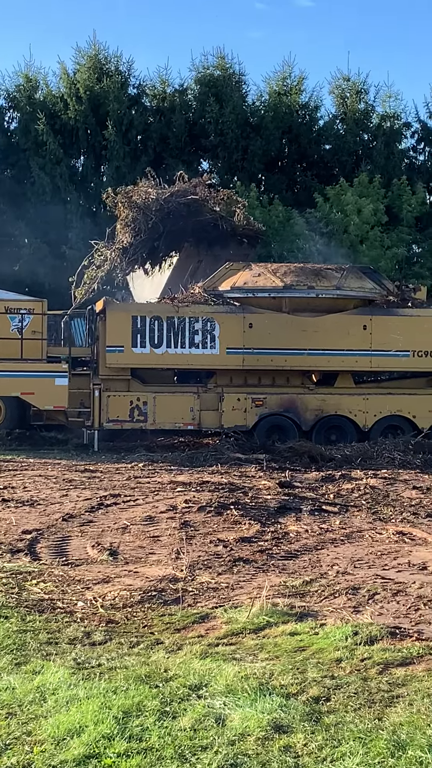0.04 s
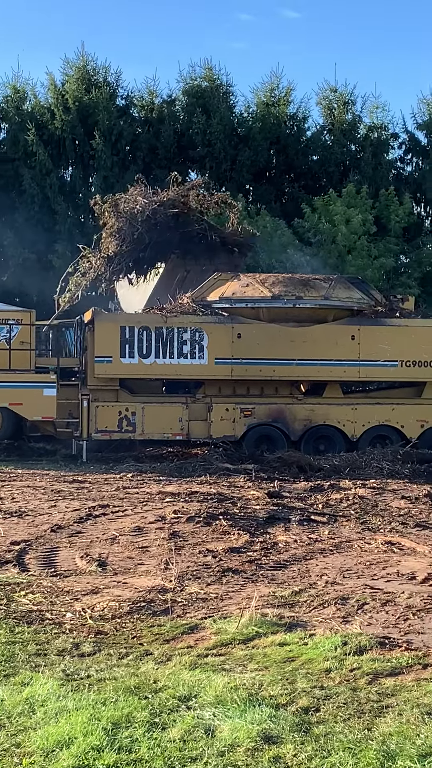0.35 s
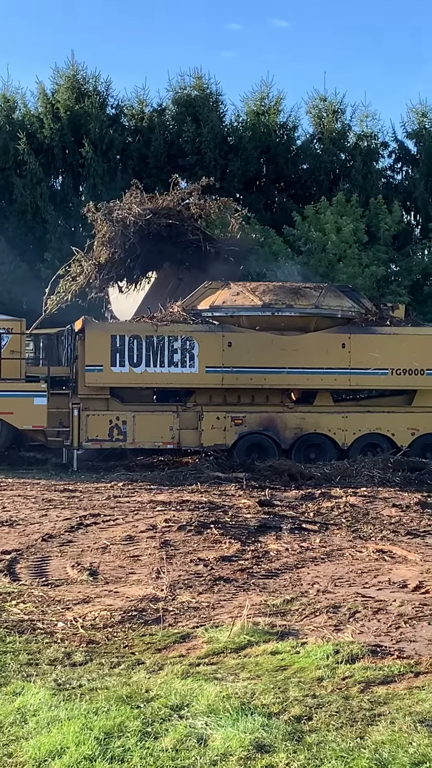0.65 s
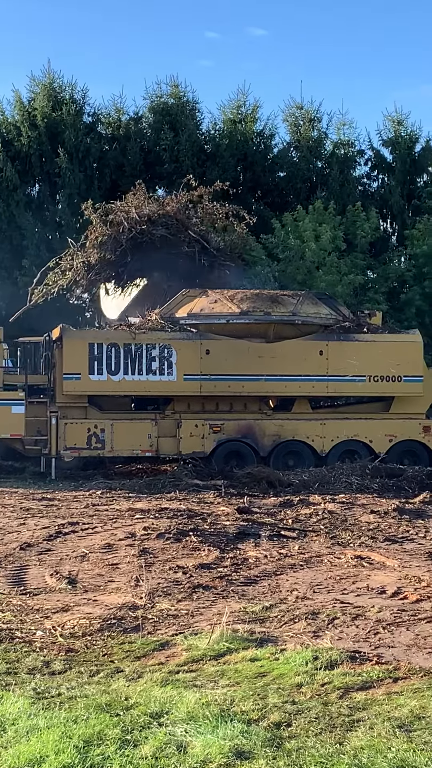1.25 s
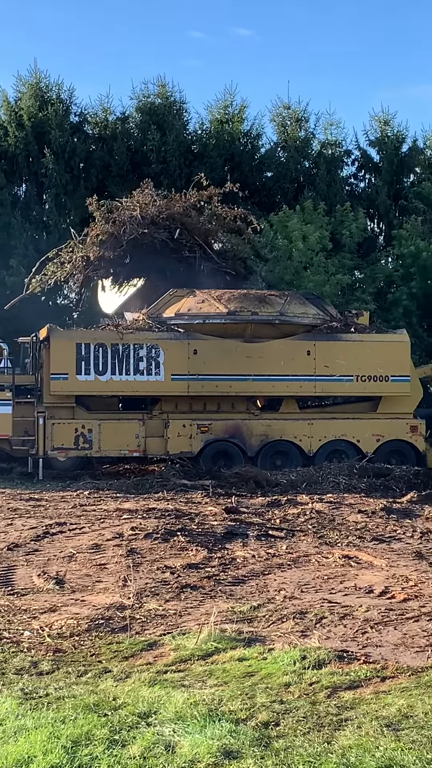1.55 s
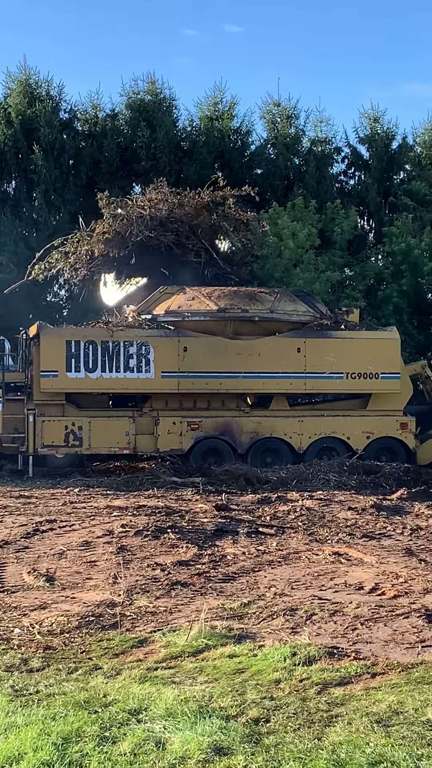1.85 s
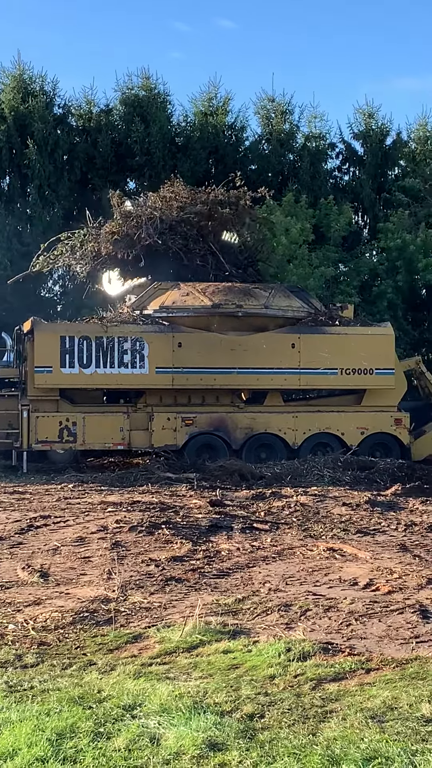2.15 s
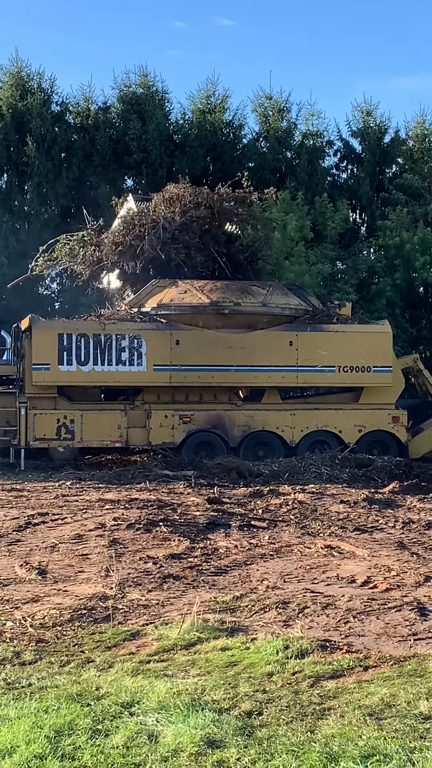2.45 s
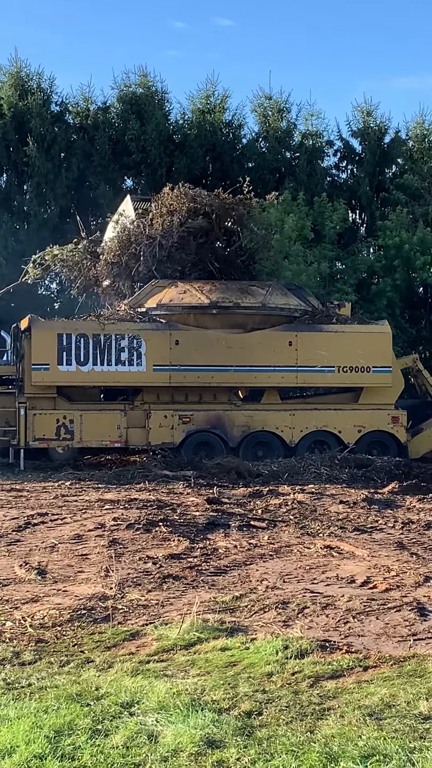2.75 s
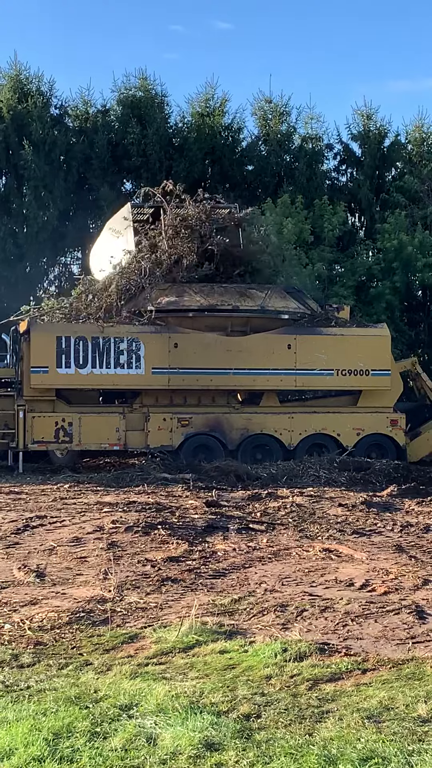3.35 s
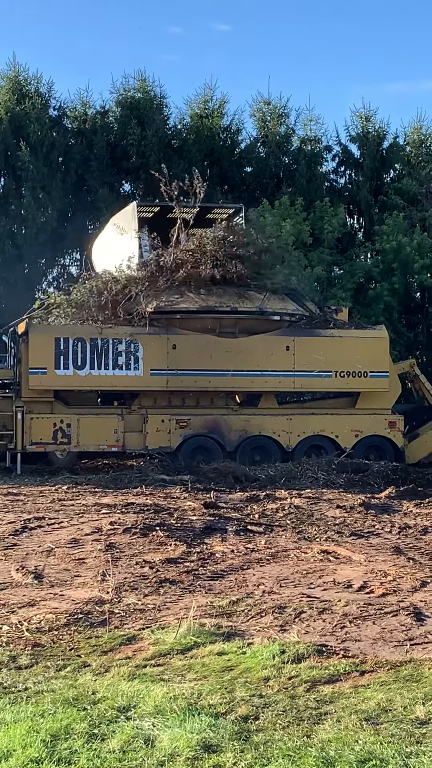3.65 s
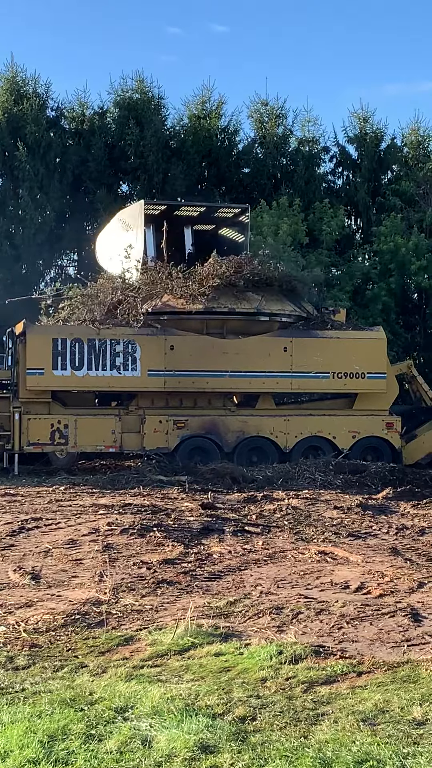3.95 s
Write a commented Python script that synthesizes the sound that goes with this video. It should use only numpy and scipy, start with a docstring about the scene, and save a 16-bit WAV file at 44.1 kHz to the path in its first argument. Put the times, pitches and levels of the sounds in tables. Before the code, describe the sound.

A tub grinder chews brush throughout, heard from a distance outdoors: two diesel engines drone over a low rumble, rattling chips and hissing twigs. At about 0.8 seconds a heavy piece bangs on the steel tub, followed by a brief squeal. Lighter knocks come at 1.4 and 3.4 seconds. Branches crunch and snap irregularly with a slight echo, most around 1.5, 2.2 and 3 seconds.

```python
"""A tub grinder chewing brush

A loader feeds a diesel grinder on open ground, heard from afar by two close microphones.
Both engines drone over the rumbling hammermill. Chips batter the steel tub, twigs shred into a hiss,
branches crunch and sticks snap. One heavy piece bangs on the tub, jammed wood squeals briefly,
and two lighter knocks follow. The crunches, snaps and knocks echo off the machines and trees."""
import sys
import numpy as np
from scipy import signal
from scipy.fft import rfft, irfft
from scipy.io import wavfile
from scipy.ndimage import uniform_filter1d

SR = 44100
rng = np.random.default_rng(int(sys.argv[2]) if len(sys.argv) > 2 else 0)


def master_out(mix):
    """Clip the mix to full scale and print it as 16-bit PCM to the path in sys.argv[1]."""
    frames = np.transpose(np.atleast_2d(mix))
    ceiling = np.clip(frames, -1, 1)
    pcm = np.round(ceiling * 32767).astype(np.int16)
    wavfile.write(sys.argv[1], SR, pcm)


N = 176400
TIME = np.arange(N) / SR

# Engine pitch, at 6 (grinder) and 5 (loader) cycles per turn of the crankshaft: t/s, f/Hz
GRINDER_PITCH = [(0.0, 207.1), (0.07, 205.0), (0.42, 210.8), (1.78, 210.8), (2.06, 208.2), (2.66, 210.7),
                 (3.8, 210.8)]
LOADER_PITCH = [(0.0, 189.0), (0.93, 189.5), (1.57, 190.5), (1.96, 188.5), (3.13, 190.5), (3.8, 189.5)]
# The tones in each engine's drone: cycles per turn, level/dB
GRINDER_TONES = [(2, -32.5), (4, -35), (6, -25.5), (12, -44.5), (18, -33), (21, -51), (37.5, -41.5)]
LOADER_TONES = [(3, -8), (5, 0.5), (7.5, -16.5), (8.5, -20.5), (37.5, -20), (43, -16)]
# How the nonstop sounds swell and fade: t/s, level/dB
LOADER_LEVEL = [(0, -17.5), (.7, -23), (1, -31.5), (1.5, -20.5), (2.2, -24), (3, -23), (4, -26)]
RUMBLE_LEVEL = [(0, -24), (.15, -21.5), (.48, -25.5), (.75, -21), (1, -29), (1.25, -27), (1.5, -23.5),
                (1.9, -21), (2.15, -22), (2.33, -27.5), (2.8, -24), (3.2, -25.5), (3.45, -25.5), (4, -24.5)]
CHIPS_LEVEL = [(0, -16), (.13, -22.5), (.4, -24.5), (.8, -24), (1.05, -27), (1.32, -27.5), (1.42, -24),
               (1.75, -23), (1.95, -22.5), (2.27, -22.5), (2.47, -26), (2.8, -24.5), (3.05, -23.5),
               (3.22, -25.5), (3.38, -23.5), (3.8, -26.5), (4, -24)]
TWIGS_LEVEL = [(0, -30), (.2, -32.5), (.4, -31.5), (.6, -33.5), (.82, -34.5), (.9, -38.5), (1.15, -39.5),
               (1.35, -36.5), (1.5, -31), (1.62, -35.5), (1.78, -33.5), (1.81, -29), (1.88, -32.5),
               (2.15, -29.5), (2.46, -32.5), (2.75, -28), (3.03, -30), (3.25, -32), (3.33, -29),
               (3.38, -30.5), (4, -32)]
# The tone colour of each noise, from bass to treble: f/Hz, level/dB
RUMBLE_COLOUR = [(12, -75), (26, -49), (36, -14), (48, -5), (70, 1), (110, 1.5), (160, 1.5), (230, 0),
                 (290, -9), (370, -19.5), (600, -25), (2000, -74.5)]
CHIPS_COLOUR = [(200, -16.5), (380, -6), (520, -3.5), (650, -1), (800, 2), (940, -8), (1060, -2.5),
                (1260, -1.5), (1500, -5.5), (1750, -3.5), (2100, -10.5), (2600, -20.5), (4000, -14.5),
                (12000, -78)]
TWIGS_COLOUR = [(900, -17), (2400, 2), (3400, 1.5), (4600, -1), (6200, -2), (7700, -7), (8200, -5.5),
                (10000, -9), (12500, -15), (14500, -18), (16000, -25)]
CRACK_COLOUR = [(150, -42.5), (380, -30), (550, -1.5), (720, 4.5), (950, -14), (1300, 3), (1900, 1.5),
                (2500, -8.5), (4000, -16.5), (12000, -62)]
SPLINTER_COLOUR = [(700, -16), (1800, -2.5), (3100, 7), (4000, 3), (5200, -3.5), (7500, -15), (9000, -18.5),
                   (15000, -28)]
SNAP_COLOUR = [(600, -36), (2000, 10.5), (3300, 5), (6000, 2), (10000, -5), (15000, -25)]
CLUNK_COLOUR = [(150, -48), (420, -40), (550, 6.5), (780, 5.5), (940, -25), (1080, -15), (1280, -1.5),
                (1550, -5), (2100, -7), (2600, -25), (8000, -45)]
# The steel tub's notes: f/Hz, level under chips/dB, level under a blow/dB, time to fade 60 dB/s
TUB_NOTES = [(523, -7.5, -11, 0.9), (564, -21, -7.5, 0.67), (626, -9, -9, 0.56), (697, 9, -25, 0.089),
             (778, -11, -8.5, 1), (1229, 2, -17, 0.12), (1290, -12, -13, 0.42), (1613, 3, -24, 0.2),
             (2010, -21, -20, .08)]
# The struck wood's notes: f/Hz, level/dB, time to fade 60 dB/s
WOOD_NOTES = [(630, -15, 0.021), (660, -5, 0.048), (782, -1, 0.054), (1263, -2.5, 0.044), (1540, -9, 0.027),
              (1900, -5, 0.016), (2170, -23, .014)]
# Branches caught by the hammers: t/s, length/s, crack level/dB, splinter level/dB
CRUNCHES = [(.002, 0.046, -38, -36), (0.17, .035, -26.5, -28), (0.623, 0.031, -40, -30.5),
            (0.738, 0.023, -24, -22), (0.768, 0.012, -35, -25), (0.827, 0.025, -21, -21),
            (0.962, 0.01, -45, -41), (1.153, 0.029, -57, -37.5), (1.401, 0.024, -23.5, -53),
            (1.465, 0.012, -31, -26), (1.498, 0.029, -19, -23), (1.533, 0.031, -23.5, -42),
            (1.661, 0.04, -17, -31), (1.799, 0.05, -34, -30), (2.017, 0.017, -23, -32),
            (2.079, 0.022, -23.5, -30), (2.131, 0.043, -24, -21.5), (2.217, 0.01, -25.5, -22),
            (2.227, 0.058, -22.5, -51), (2.302, 0.025, -40, -29.5), (2.338, 0.021, -31, -27.5),
            (2.626, 0.015, -25, -47), (2.721, 0.019, -27, -44.5), (2.925, 0.046, -23, -24.5),
            (2.986, 0.025, -20.5, -19), (3.018, 0.094, -30, -39), (3.313, 0.021, -30, -29.5),
            (3.487, 0.044, -29, -29), (3.581, 0.0088, -21.5, -31)]
# Thick wood thumping in the mill: t/s, level/dB, f/Hz
THUMPS = [(0.03, -10, 161), (0.089, -20, 123), (1.916, -19, 85), (2.09, -22, 78), (2.105, -14.5, 158),
          (2.227, -22, 66), (2.749, -24.5, 139)]
# Echoes off the machines and trees: delay/s, level/dB
ECHOES = [(.047, -10), (.083, -9.5), (.128, -21.5)]
# Dry sticks snapping: t/s, level/dB
SNAPS = [(0.1821, -21), (0.7409, -29), (0.7723, -25), (0.8257, -14.5), (.972, -28), (1.4128, -34),
         (1.472, -16), (1.4996, -26), (1.5146, -20), (1.6628, -32), (2.1342, -18.5), (2.217, -14),
         (2.3008, -28), (2.3447, -28), (2.9339, -20), (2.9893, -16), (3.512, -14.5)]
# The heavy piece hammered against the tub, then two lighter knocks: t/s, level/dB
BLOWS = [(.8285, -5), (.8323, -7.5), (.8349, -17), (.8426, -5.5), (.8535, -11), (.8845, -13.5),
         (1.391, -14), (3.384, -17.5)]
# How far the wave at the left microphone is ahead of the right: f/Hz, phase/rad
LEFT_LEAD = [(0, 0), (950, 0.48), (2000, 0.09), (2700, 1.89), (3500, 1.5), (4350, 2.5), (4780, 3),
             (5300, 4.5), (9000, 9.5), (13000, 15.5), (16000, 20.5)]
# Scattered sound reaching the microphones: f/Hz, level/dB
SCATTER_COLOUR = [(100, -29), (220, -33.5), (400, -6.5), (700, -20.5), (980, -4.5), (1400, -34), (2000, -8),
                  (2550, -19), (3200, -4.5), (6000, -39.5), (14000, -67)]


def from_db(db):
    """Turn decibels into a factor to multiply by."""
    return 10 ** (np.asarray(db) / 20)


def in_time(rows):
    """Join points in time with straight lines."""
    return np.interp(TIME, *np.transpose(rows))


def gains(spectrum):
    """Turn a tone colour into one factor per frequency."""
    hz, db = np.transpose(spectrum)
    return from_db(np.interp(np.log(np.arange(N + 1) * SR / (2 * N) + 1), np.log(hz), db))


def colour(x, spectrum):
    """Give a sound a tone colour; white noise keeps its level."""
    gain = gains(spectrum)
    cepstrum = irfft(np.log(gain / np.sqrt(np.mean(gain ** 2))))[:N]
    cepstrum[1:] *= 2  # the filter rings after a click, never before
    return irfft(rfft(x, 2 * N) * np.exp(rfft(cepstrum, 2 * N)))[:N]


def drift(rate_hz):
    """A smooth random wobble of about size 1, mostly slower than rate_hz."""
    hz = np.arange(N // 2 + 1) * SR / N
    slow = irfft(rfft(rng.standard_normal(N)) / (1 + (hz / rate_hz) ** 2), N)
    return (slow - slow.mean()) / slow.std()


def grains(per_s, spread_db):
    """Random clicks of uneven size, with average power 1."""
    clicks = (rng.random(N) < per_s / SR) * rng.choice([-1, 1], N)
    clicks = clicks * from_db(spread_db * np.minimum(rng.exponential(1, N), 4))
    return clicks / (clicks.std() + 1e-12)


def burst(start, length_s, fade_s, rise_s=0.0035):
    """A loudness curve that rises fast, holds and fades."""
    age = TIME - start
    return np.clip(age / rise_s, 0, 1) * np.exp(-np.clip((age - length_s) / fade_s, 0, 20))


def strikes(rows, fade_s):
    """The loudness curve of sudden hits that die away; their powers add."""
    hits = (from_db(db) * (TIME >= s) * np.exp(-np.clip((TIME - s) / fade_s, 0, 20)) for s, db in rows)
    return np.sqrt(sum(hit ** 2 for hit in hits))


def ring(clicks, notes):
    """A struck object rings with its own fading notes."""
    out = 0
    for hz, db, ring_s in notes:
        decay, step = from_db(-60 / (ring_s * SR)), 2 * np.pi * hz / SR
        feedback = [1, -2 * decay * np.cos(step), decay * decay]
        out = out + from_db(db) * signal.lfilter([0, np.sin(step)], feedback, clicks + 1e-18)
    return out


def engine(pitch, tones, cycles_per_turn, waver_db, jitter):
    """A slightly unsteady crankshaft drives a set of tones, each wavering in level."""
    turns = np.cumsum(in_time(pitch) / cycles_per_turn * (1 + jitter * drift(13))) / SR
    return sum(from_db(db + waver_db * drift(2.7)) * np.sin(2 * np.pi * (cycles * turns + rng.random()))
               for cycles, db in tones)


def mill(boost_db=2.5):
    """The hammermill rumbles, and thumps when it meets thick wood."""
    rumble = from_db(in_time(RUMBLE_LEVEL) + boost_db) * rng.standard_normal(N)
    thumps = sum(from_db(db) * thump(s, hz) for s, db, hz in THUMPS)
    return colour(rumble, RUMBLE_COLOUR) + thumps


def chips(flutter_db=0.2, ring_db=-17.5):
    """A hail of chips rattles in the tub and keeps it ringing."""
    hail = grains(per_s=3500, spread_db=1.5) * from_db(flutter_db * drift(25))
    steel = ring(hail, [(hz, db, ring_s) for hz, db, _, ring_s in TUB_NOTES])
    rattle = colour(hail, CHIPS_COLOUR) + from_db(ring_db) * steel / steel.std()
    return from_db(in_time(CHIPS_LEVEL)) * rattle


def twigs(flutter_db=1.06):
    """Fine brush shreds into a grainy hiss."""
    shreds = grains(per_s=10000, spread_db=1.5)
    return colour(shreds * from_db(in_time(TWIGS_LEVEL) + flutter_db * drift(17)), TWIGS_COLOUR)


def bites(per_s=140, fade_s=0.004, spread_db=1):
    """A jagged loudness curve: the hammers bite in quick, uneven succession."""
    count = np.cumsum(per_s * np.exp(.3 * drift(40))) / SR
    strength = from_db(spread_db * rng.standard_normal(N))[count.astype(int)]
    power = (strength * np.exp(-(count % 1) / per_s / fade_s)) ** 2
    return np.sqrt(.5 + .5 * power / power.mean())  # half steady, half bites


def crunches():
    """Each branch breaks, bite by bite, into woody cracks and brighter splinters."""
    cracks = sum(from_db(db) * burst(s, length, fade_s=0.019) for s, length, db, _ in CRUNCHES)
    splinters = sum(from_db(db) * burst(s, length, fade_s=0.0082) for s, length, _, db in CRUNCHES)
    cracks *= grains(per_s=4000, spread_db=1.5)
    splinters *= grains(per_s=4000, spread_db=2)
    jagged = bites()
    return colour(jagged * cracks, CRACK_COLOUR) + colour(jagged * splinters, SPLINTER_COLOUR)


def thump(start, hz, width_octaves=0.7):
    """Thick wood gives a dull puff of noise around one pitch."""
    edges = hz * 2 ** (np.array([-.5, .5]) * width_octaves)
    band = signal.sosfilt(signal.butter(2, edges, "band", fs=SR, output="sos"), rng.standard_normal(N))
    return burst(start, length_s=0.027, fade_s=0.024) * band / band.std()


def echoes(x, cut_hz=1900):
    """The machines and trees send back late, dull copies of a sound."""
    dull = signal.sosfilt(signal.butter(2, cut_hz, fs=SR, output="sos"), x)
    return sum(from_db(db) * np.interp(TIME - s, TIME, dull, left=0) for s, db in ECHOES)


def snaps(gain_db=-3.5):
    """Dry sticks break with short, bright cracks."""
    return from_db(gain_db) * colour(strikes(SNAPS, fade_s=0.0046) * rng.standard_normal(N), SNAP_COLOUR)


def bang(wood_db=-3, steel_db=-17, clunk_db=-4, boom_db=-21):
    """Each hard blow gives a hollow wooden clunk, rings the steel and booms on inside the tub."""
    clicks = np.zeros(N)
    for s, db in BLOWS:
        clicks[int(s * SR)] += from_db(db)
    wood = from_db(wood_db) * ring(clicks, WOOD_NOTES)
    steel = from_db(steel_db) * ring(clicks, [(hz, db, ring_s) for hz, _, db, ring_s in TUB_NOTES])
    clunk = from_db(clunk_db) * strikes(BLOWS, fade_s=0.0045)
    boom = from_db(boom_db) * strikes(BLOWS, fade_s=0.13)
    return wood + steel + colour((clunk + boom) * rng.standard_normal(N), CLUNK_COLOUR)


def squeal(peak_s=0.96, half_width_s=0.049, hz=1200, db=-23.5, jitter=.003):
    """Jammed wood rubs on the steel and makes one short, unsteady note."""
    swell = np.exp(-((TIME - peak_s) / half_width_s) ** 2)
    cycles = np.cumsum(hz * (1 + jitter * drift(30))) / SR
    return from_db(db) * swell * np.sin(2 * np.pi * cycles)


def thin(x, cut_hz=465):
    """Breaking wood gives off little bass."""
    return signal.sosfilt(signal.butter(4, cut_hz, "high", fs=SR, output="sos"), x)


def microphones(x, scatter_s=0.057, shimmer_hz=1.7):
    """Left and right hear the sound out of step, plus shimmering scattered sound of opposite sign."""
    tail = rng.standard_normal(N) * np.exp(-np.minimum(TIME / scatter_s, 20))
    direct = rfft(x, 2 * N)
    scattered = irfft(direct * rfft(tail / np.linalg.norm(tail), 2 * N) * gains(SCATTER_COLOUR))[:N]
    shimmer = rfft(np.real(signal.hilbert(scattered) * np.exp(2j * drift(shimmer_hz))), 2 * N)
    half_lead = np.exp(.5j * np.interp(np.arange(N + 1) * SR / (2 * N), *np.transpose(LEFT_LEAD)))
    return irfft(np.array([(direct + shimmer) * half_lead, (direct - shimmer) / half_lead]))[:, :N]


def gain_control(x, threshold_db=-7, recovery_db_per_s=11.5, window_s=0.0081):
    """A loud blow turns the volume down at once; it creeps back up."""
    power = uniform_filter1d(np.mean(x ** 2, axis=0), int(window_s * SR) + 1)
    excess_db = np.maximum(10 * np.log10(np.abs(power) + 1e-12) - threshold_db, 0)
    recovery_db = recovery_db_per_s * TIME
    return x * from_db(recovery_db - np.maximum.accumulate(excess_db + recovery_db))


def scene():
    """Engines, mill and breaking wood, all from one direction."""
    grinder = engine(GRINDER_PITCH, GRINDER_TONES, cycles_per_turn=6, waver_db=1.4, jitter=0.0009)
    loader = engine(LOADER_PITCH, LOADER_TONES, cycles_per_turn=5, waver_db=0.2, jitter=0.0013)
    loader *= from_db(in_time(LOADER_LEVEL))
    breaking = thin(crunches() + snaps())
    blows = thin(bang())
    wood = chips() + twigs() + squeal() + breaking + blows
    echo = echoes(breaking + from_db(-6) * blows)
    return microphones(grinder + loader + mill() + wood + echo)


def record(dry):
    """Hold down loud blows, round off the peaks and cut the highest treble."""
    held = gain_control(dry)
    rounded = held / (1 + held ** 6) ** (1 / 6)
    return signal.sosfilt(signal.cheby2(16, 60, 16200, fs=SR, output="sos"), rounded)


dry = scene()
out = record(dry)
master_out(out)
```